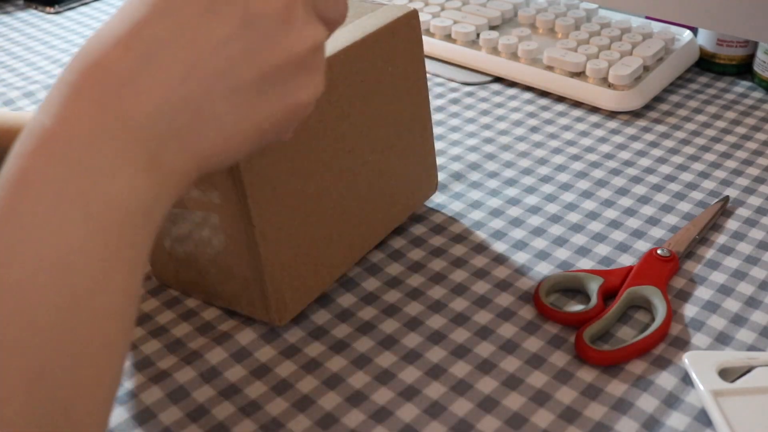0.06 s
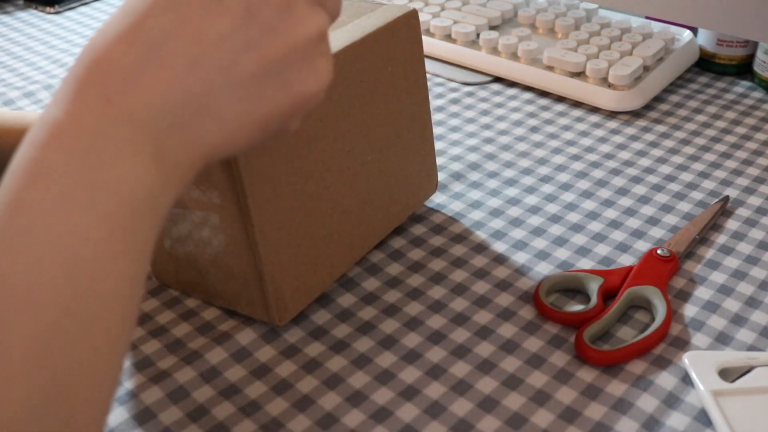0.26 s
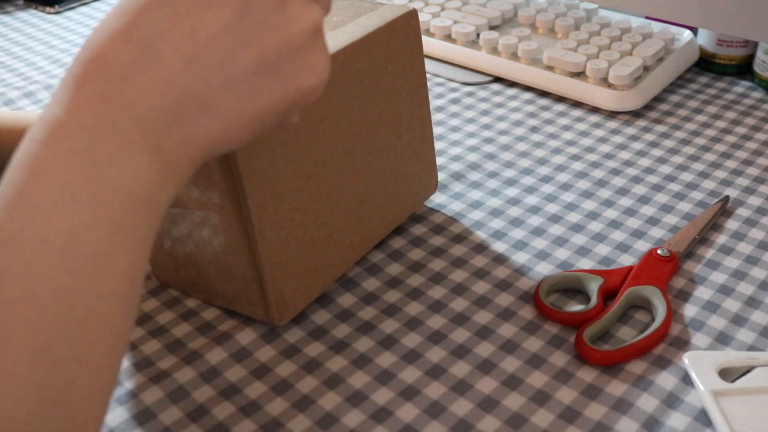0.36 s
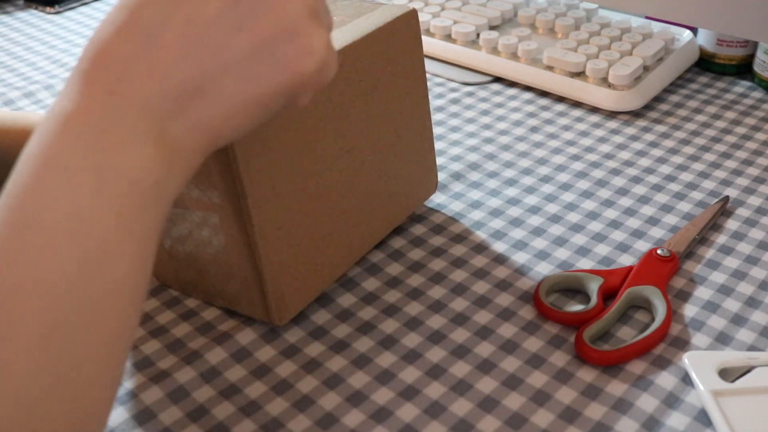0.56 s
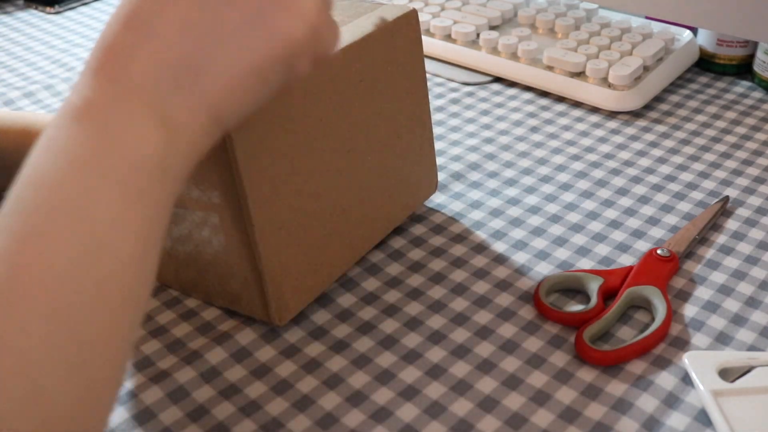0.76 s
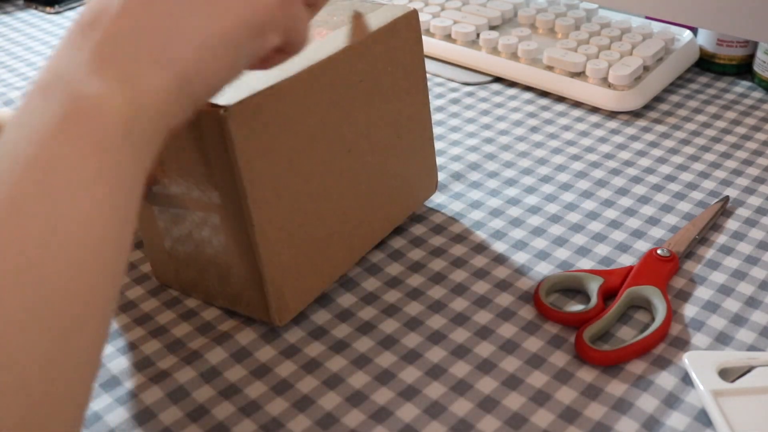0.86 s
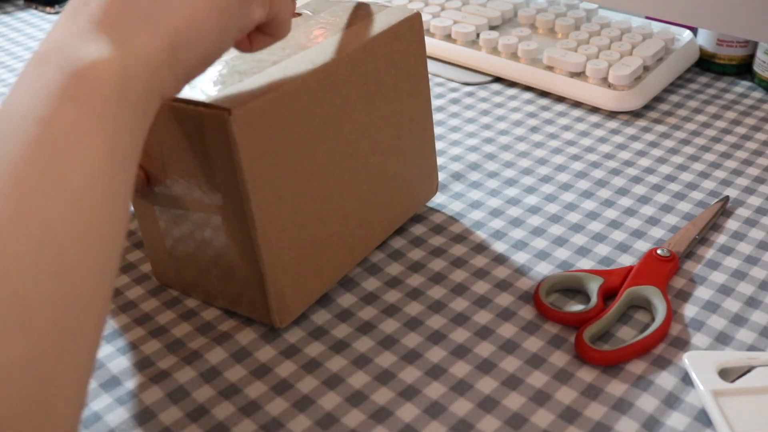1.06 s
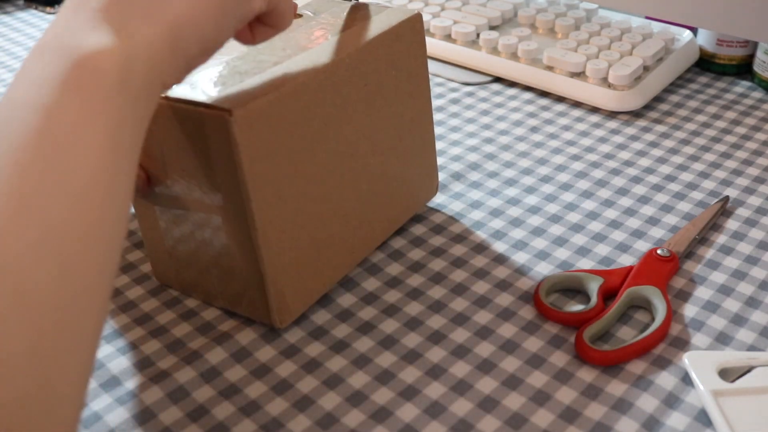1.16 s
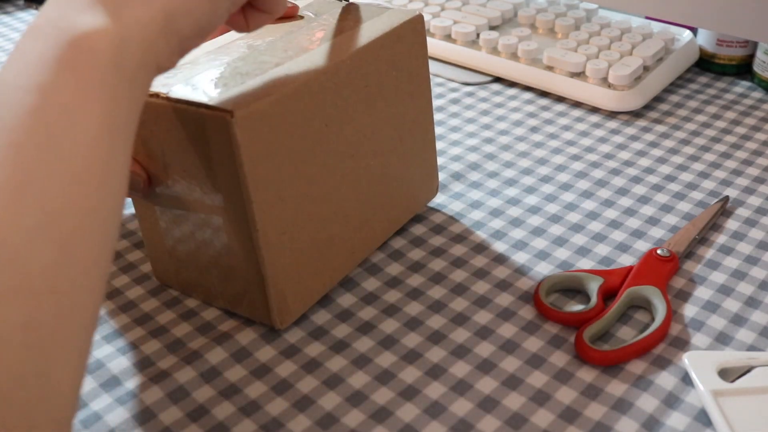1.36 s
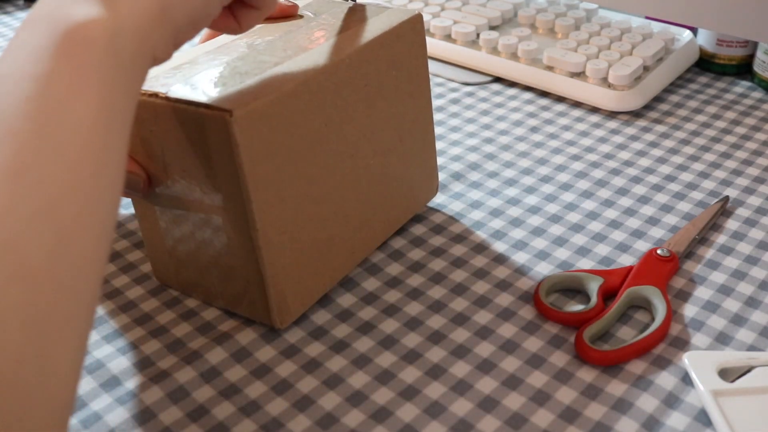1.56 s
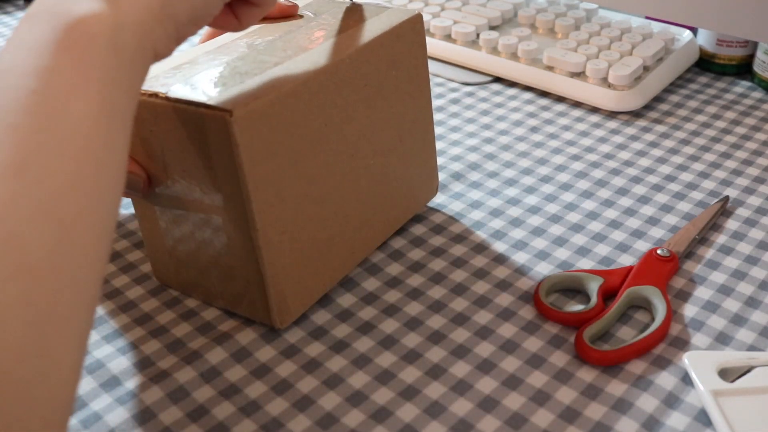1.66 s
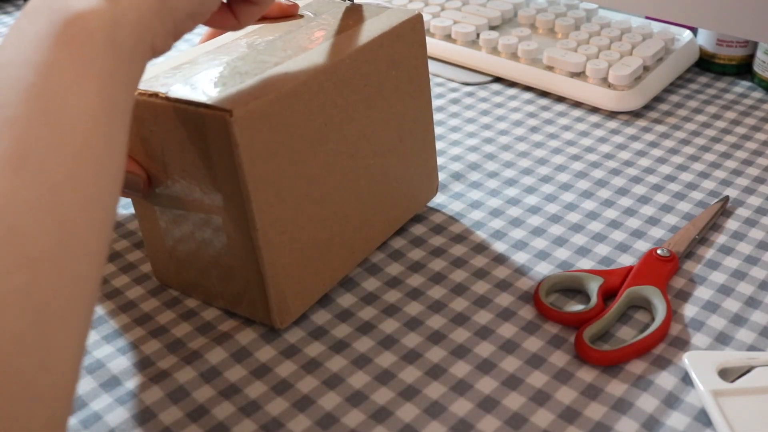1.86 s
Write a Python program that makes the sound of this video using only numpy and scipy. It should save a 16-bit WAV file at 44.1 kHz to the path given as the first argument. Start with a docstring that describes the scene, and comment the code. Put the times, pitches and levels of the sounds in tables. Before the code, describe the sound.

Seven sharp clicks of a craft knife extending, followed by light ticks on taped cardboard.

```python
"""In a small room with a low hum, fingers rub on a craft knife close by and its slider rattles lightly.
The blade is pushed out in seven sharp ratchet snaps that slow down, its ring falling as it lengthens,
and the slider settles with a thin ping. A hand takes hold of a cardboard box, which drones faintly,
then bumps and slides on it. Last, the tip picks at the tape: small ticks, soft thuds and two pops."""
import sys
import numpy as np
from scipy import signal
from scipy.fft import rfft, irfft
from scipy.io import wavfile
from scipy.ndimage import uniform_filter1d

SR = 44100
rng = np.random.default_rng(int(sys.argv[2]) if len(sys.argv) > 2 else 0)


def transcribe(u):
    """Save the signal u as a 16-bit wav file named by the first command-line argument.

    u: samples, shape (n,) or (channels, n), limited to [-1, 1]; the rate is SR.
    q: integer samples, one column per channel.
    """
    v = np.clip(np.atleast_2d(u).T, -1, 1)
    q = np.round(v * 32767).astype(np.int16)
    wavfile.write(sys.argv[1], SR, q)


N = 83790
TIME = np.arange(N) / SR
BRIEF = TIME[:2048]   # time axis of one impact
CLICK_COHERENCE = 0.35   # left-right correlation of close clicks


def from_db(db):
    """Amplitude grows tenfold every 20 dB."""
    return 10 ** (np.asarray(db) / 20)


def rms_one(x):
    """Normalisation: each channel is scaled to rms 1."""
    return x / np.sqrt(np.mean(x ** 2, axis=-1, keepdims=True) + 1e-20)


def at_hz(points, hz):
    """Interpolation on a log-frequency axis."""
    freqs, values = np.transpose(points)
    return np.interp(np.log(hz), np.log(freqs), values)


def pan(db):
    """Interaural level difference: positive is to the left."""
    return from_db([[db / 2], [-db / 2]])


def delayed(x, delay_s):
    """A linear phase shift delays by any fraction of a sample."""
    size = 2 * N
    shift = np.exp(-2j * np.pi * np.fft.rfftfreq(size, 1 / SR) * delay_s)
    return irfft(rfft(x, size) * shift, size)[..., :N]


def stereo_noise(size, coherence):
    """Partial coherence: two channels share part of their white noise."""
    mid, side = rng.standard_normal((2, size))
    return np.sqrt(1 + coherence) * mid + np.sqrt(1 - coherence) * side * [[1], [-1]]


def resonate(x, hz, width_hz):
    """A damped resonator: the wider its band, the faster it decays."""
    r = np.exp(-np.pi * width_hz / SR)
    return signal.lfilter([1, 0, -1], [1, -2 * r * np.cos(2 * np.pi * hz / SR), r * r], x + 1e-18)


def contact(rise_s, delay_s=0):
    """An impact's force swells, then decays exponentially."""
    age = np.maximum(BRIEF - delay_s, 0) / rise_s
    return age * np.exp(-age) + 1e-12


def ring(force, hz, width_hz):
    """Forced vibration of one mode, broadened by a random walk of phase; rms 1."""
    drift = np.cumsum(rng.standard_normal(len(BRIEF))) * np.sqrt(2 * np.pi * width_hz / SR)
    tone = np.sin(2 * np.pi * (hz * BRIEF + rng.random()) + drift)
    return rms_one(resonate(force * tone, hz, 3 * width_hz))


def clack(hz, width_hz):
    """Impulse response of a heavily damped mode; rms 1."""
    impulse = 1.0 * (BRIEF == 0)
    return rms_one(resonate(resonate(impulse, hz, width_hz), hz, width_hz))


def drone(modes):
    """Narrow resonances driven by noise give wavering tones."""
    out = 0
    for hz, db, width in modes:
        narrow = resonate(rng.standard_normal(N + SR), hz, width)
        out = out + from_db(db) * rms_one(resonate(narrow, hz, 2 * width)[SR:])
    return out


def add(track, start_s, db, sound):
    """Superposition of a brief sound; its level is its energy spread over 3 ms."""
    start = int(start_s * SR)
    scale = np.sqrt(.003 / BRIEF[-1])
    track[:, start:start + len(BRIEF)] += scale * from_db(db) * sound[:, :N - start]


EDGES_HZ = np.r_[np.geomspace(22, 2000, 15)[:-1], np.geomspace(2000, 17000, 15)]
# filter bank: centre_hz, width_hz, filter
BANDS = [(np.sqrt(lo * hi), hi - lo, signal.butter(2, [lo, hi], "band", fs=SR, output="sos"))
         for lo, hi in zip(EDGES_HZ, EDGES_HZ[1:])]
# left-right correlation in the room: frequency_hz, coherence
COHERENCE = [(50, 0.9), (250, 0.91), (600, 0.54), (1500, 0.14), (5000, 0.069), (14000, 0.086)]

def coloured(force, spectrum, tilt_db=0, coherence=None):
    """Source and filter: roughness under a force curve excites a bank of bands; rms 1."""
    out = 0
    for hz, width, sos in BANDS:
        noise = stereo_noise(len(force), at_hz(COHERENCE, hz) if coherence is None else coherence)
        if hz > spectrum[0][0] / 2:
            gain = from_db(at_hz(spectrum, hz) + tilt_db * np.log2(hz)) * np.sqrt(width)
            out = out + gain * rms_one(signal.sosfilt(sos, noise * force))
    return rms_one(out)


# the room's hum: pitch_hz, level_db, width_hz
HUM_MODES = [(71.75, -66.5, 6.3), (133.7, -64.5, 7.2), (220, -62.5, 14.6), (264.45, -59, 8.2),
             (334.7, -65.5, 4.6), (415, -71, 19)]
# the room's noise: frequency_hz, density_db
AIR_SPECTRUM = [(15, -44), (25, -2), (70, -5), (175, -3), (256, 0.5), (384, -24), (439, -6), (840, -15.5),
                (1160, -13), (1330, -17), (4370, -27), (6380, -25.5), (7310, -30), (7920, -27.5),
                (16000, -38)]

def background():
    """Stationary noise: a narrowband hum over a broadband floor."""
    return drone(HUM_MODES) + from_db(-54.5) * coloured(np.ones(N), AIR_SPECTRUM)


# fingers on the knife, hand on the box: time_s, level_db
GRIP_LEVELS = [(0, -53), (.03, -64), (.05, -48.5), (.12, -63), (.17, -65), (.23, -67), (1.9, -74.5)]
SLIDE_LEVELS = [(0, -58), (.88, -65), (.925, -73), (.937, -60.5), (.972, -49.5), (1.0, -53.5),
                (1.04, -56.5), (1.09, -64), (1.15, -51.5), (1.24, -77), (1.29, -59), (1.4, -73),
                (1.5, -58.5), (1.6, -77), (1.68, -64), (1.8, -72), (1.9, -82.5)]
# their friction noise: frequency_hz, density_db
GRIP_SPECTRUM = [(400, 5.5), (1500, -18.5), (3500, -24), (6000, -2.5), (10000, -3), (13000, -11.5),
                 (16000, -13)]
SLIDE_SPECTRUM = [(100, -12.5), (250, 1), (400, -8.5), (520, -4), (800, -13), (1300, -6), (2000, -9),
                  (3100, -4.5), (4500, -12.5), (6000, -12), (10000, -14), (16000, -25)]

def rub(levels, spectrum, grain_db):
    """Stick-slip friction: skin catches and slips in grains of a few milliseconds."""
    roughness = rms_one(uniform_filter1d(rng.standard_normal(N), size=130))
    envelope = from_db(np.interp(TIME, *np.transpose(levels)))
    return envelope * coloured(from_db(grain_db * roughness), spectrum)


# light rattles: start_s, level_db, rise_s
RATTLE_HITS = [(0.043, -57, 0.0014), (0.0604, -37, 0.00084), (0.096, -54, 0.00079), (0.111, -40, 0.00032),
               (0.157, -50, 0.00066), (0.174, -43, 0.0014), (0.8860, -46, 0.0016), (0.892, -29, 0.00042),
               (0.8933, -33, 0.0047), (1.3586, -34.5, 0.00056)]
# their colour: frequency_hz, density_db
RATTLE_SPECTRUM = [(500, -17.5), (1700, -19.5), (2600, -10), (3100, -11), (3750, -6), (4500, -7), (5800, 4),
                   (7500, -2), (10000, 4), (13500, -7.5), (16500, -15.5)]

def rattles():
    """Light impacts of slider and blade radiate broadband clicks."""
    out = np.zeros((2, N))
    for start_s, db, rise_s in RATTLE_HITS:
        add(out, start_s, db, coloured(contact(rise_s), RATTLE_SPECTRUM, coherence=CLICK_COHERENCE))
    return out


def snap_force(rebound_db, rise_s=0.0004):
    """Elastic impact: the spring drops into a notch and rebounds once."""
    return contact(rise_s) + from_db(rebound_db) * contact(rise_s, delay_s=0.0012)


# the slider jumps a notch: start_s, case_db, blade_db, blade_pitch_hz, rebound_db,
# tilt_db_per_octave, handle_db, knock_db, wash_db
NOTCHES = [(0.2312, -23.5, -19, 10010, -4.5, -1.5, -32, -61, -35),
           (0.29, -23, -17.5, 10110, -4.5, -1.5, -33, -63, -38),
           (0.3604, -24.5, -17, 9960, -5, 0, -32, -55, -38.5),
           (0.4290, -25, -18.5, 9300, -10, 1, -37, -57, -37.5),
           (0.5092, -21, -19, 9170, -6, 0.5, -46, -53.5, -37.5),
           (0.6042, -18.5, -20, 9050, -4, 1, -39, -49, -37),
           (0.7176, -16.5, -19, 8610, 2, 1, -43.5, -39.5, -34)]
# the case's crack: frequency_hz, density_db
CASE_SPECTRUM = [(400, -50), (1500, -21), (2700, -10.5), (3700, -20.5), (5200, -6.5), (6800, -1.5),
                 (8500, -4), (10600, 8), (12800, 2), (15300, -3), (16500, -4)]

def case_cracks():
    """Impact excitation: each snap cracks through the knife's case."""
    out = np.zeros((2, N))
    for start_s, db, _, _, rebound_db, tilt_db, *_ in NOTCHES:
        crack = coloured(snap_force(rebound_db), CASE_SPECTRUM, tilt_db, CLICK_COHERENCE)
        add(out, start_s, db, pan(-1.5) * crack)
    return out


def blade_rings():
    """A longer bar has a lower natural frequency: the blade's ring falls as it slides out."""
    out = np.zeros((2, N))
    for start_s, _, db, hz, rebound_db, *_ in NOTCHES:
        add(out, start_s, db, pan(2.5) * ring(snap_force(rebound_db), hz, width_hz=740))
    return out


# dull knock in the hand: frequency_hz, density_db
KNOCK_SPECTRUM = [(200, 6), (500, -5), (1200, 9), (2500, -25), (4000, 4.5)]

def handle_knocks():
    """Structure-borne sound: each snap rings the handle and knocks in the hand."""
    out = np.zeros((2, N))
    for start_s, *_, rebound_db, _, handle_db, knock_db, _ in NOTCHES:
        add(out, start_s, handle_db, pan(-7) * ring(snap_force(rebound_db), hz=5395, width_hz=710))
        add(out, start_s, knock_db, coloured(contact(rise_s=0.00038), KNOCK_SPECTRUM))
    return out


# the snaps' wash in the room: frequency_hz, density_db
WASH_SPECTRUM = [(1500, -35), (2700, -13), (3800, -19), (4800, -4), (6000, 3.5), (7500, -0.5), (9000, 7),
                 (10500, 6.5), (12500, 1), (15300, -2), (16500, -23)]

def wash(t60_s=0.32, rise_s=0.00077):
    """Diffuse reflections add in power: the cracks return as a broad, dying hiss."""
    power = 0
    for start_s, *_, db in NOTCHES:
        age = np.maximum(TIME - start_s, 0)
        envelope = from_db(db - 60 * age / t60_s) * (1 - np.exp(-age / rise_s))
        power = power + envelope ** 2
    return np.sqrt(power.mean()) * coloured(np.sqrt(power) + 1e-12, WASH_SPECTRUM)


# the box's resonances: pitch_hz, level_db, width_hz
HELD_BOX_MODES = [(74.6, -61.5, 6.6), (140, -64, 29), (217.4, -62, 19.4), (400, -64, 75)]

def box_drone(midpoint_s=0.84, rise_s=0.13):
    """Resonance: the hollow box begins to drone as the hand takes hold."""
    hold = np.clip((TIME - midpoint_s) / rise_s + .5, 0, 1)
    return hold * drone(HELD_BOX_MODES)


def slider_ping():
    """Free vibration: one high mode rings as the slider settles."""
    out = np.zeros((2, N))
    add(out, start_s=0.8922, db=-34, sound=pan(2.5) * clack(hz=13800, width_hz=510))
    return out


# the hand lands on the box: start_s, level_db, rise_s
HAND_BUMPS = [(0.9312, -41, 0.0023), (.9500, -44, 0.0032), (.9690, -50.5, 0.002)]
# their colour: frequency_hz, density_db
BUMP_SPECTRUM = [(200, -16), (340, 9.5), (560, 5.5), (800, -7), (1400, -7), (2200, -23), (4000, -25)]

def bumps():
    """Soft impacts of the hand put their energy into low frequencies."""
    out = np.zeros((2, N))
    for start_s, db, rise_s in HAND_BUMPS:
        add(out, start_s, db, coloured(contact(rise_s), BUMP_SPECTRUM))
    return out


# the tip picks at the tape: start_s, level_db, rise_s, tilt_db_per_octave, thud_db
TAPE_PICKS = [(1.0456, -41.5, 0.0021, 5, -53), (1.1018, -40, 0.0039, 4, -67),
              (1.1085, -38.5, 0.0036, 8, -70), (1.1251, -40, 0.00038, 20, -68),
              (1.2050, -44, 0.00018, 7.5, -45), (1.266, -42.5, 0.00012, 9, -44),
              (1.325, -43, 0.0024, 1, -69), (1.3515, -46.5, 0.00035, 2, -48.5),
              (1.3585, -43.5, 0.00025, 3, -43), (1.4281, -48, 0.0014, 1.5, -55),
              (1.4768, -51.5, 0.00056, -2.5, -44.5), (1.5514, -46, 0.0012, 0.5, -47),
              (1.6700, -48, 0.0031, -1, -77), (1.6997, -45, 0.0012, 3, -50),
              (1.7555, -56, 0.00079, 2.5, -76), (1.8735, -40, 0.00048, 6.5, -42.5)]
# the tape's tick, the box's thud: frequency_hz, density_db
TAPE_SPECTRUM = [(900, -7), (2200, -19), (3600, -5.5), (4600, -15.5), (6000, -1), (7500, -16), (9500, -20),
                 (13000, -31.5), (16500, -52)]
THUD_SPECTRUM = [(120, -14), (260, 4), (400, 5), (560, -6), (700, -18), (1400, -10.5), (2500, -25)]

def picks():
    """Mechanical coupling: each pick ticks the tape, pings the tip and nudges the hollow box."""
    out = np.zeros((2, N))
    for start_s, db, rise_s, tilt_db, thud_db in TAPE_PICKS:
        add(out, start_s, db, coloured(contact(rise_s), TAPE_SPECTRUM, tilt_db, CLICK_COHERENCE))
        sharpness = 1 / (1 + rise_s / 0.00051)   # slower contacts ping less
        add(out, start_s, db - 1.5, sharpness * pan(0) * clack(hz=6100, width_hz=1200))
        add(out, start_s, thud_db, coloured(contact(rise_s=0.0036), THUD_SPECTRUM))
    return out


# the cardboard gives way: start_s, level_db, tilt_db_per_octave
CARDBOARD_POPS = [(1.1261, -31, 0), (1.4779, -43.5, -12.5)]
# its resonances: pitch_hz, level_db, width_hz
CARDBOARD_MODES = [(1890, -15.5, 470), (2440, -3.5, 620), (2740, -5, 580), (4040, -7.5, 460),
                   (6860, -18, 1300), (9600, -12, 1700)]

def pops(pivot_hz=2440):
    """Modal superposition: cardboard giving way strikes its damped modes all at once."""
    out = np.zeros((2, N))
    for start_s, db, tilt_db in CARDBOARD_POPS:
        for hz, mode_db, width in CARDBOARD_MODES:
            level_db = db + mode_db + tilt_db * np.log2(hz / pivot_hz)
            add(out, start_s, level_db, pan(-6.5) * clack(hz, width))
    return out


# the room's reverberant share: frequency_hz, gain_db
ROOM_GAINS = [(300, 5.5), (1500, -14), (3200, -11), (5300, -4.5), (7500, -8.5), (10000, -9.5),
              (14500, -16.5)]

def room(x, onset_s=0.00096):
    """Reverberation: convolution with a diffuse tail that lasts slightly longer in the treble."""
    t, response = TIME[:SR // 2], 0
    for hz, width, sos in BANDS:
        t60_s = np.interp(hz, [4000, 12000], [0.3, 0.33])
        decay = from_db(-60 * t / t60_s) * (t > onset_s)
        tail = signal.sosfilt(sos, stereo_noise(len(t), at_hz(COHERENCE, hz)) * decay)
        gain = from_db(at_hz(ROOM_GAINS, hz)) * np.sqrt(2 * width / SR / len(t))
        response = response + gain * rms_one(tail)
    return signal.fftconvolve(x, response, axes=1)[:, :N]


def scene():
    """Direct sound, one near wall's reflection and reverberation add to the rubbing and the drones."""
    cracks = case_cracks()
    body = handle_knocks() + rattles() + slider_ping()
    rings = blade_rings()
    box = picks() + bumps() + pops()
    left, right = cracks + body + rings
    direct = np.array([left, delayed(right, delay_s=0.0000205)]) + box   # the knife is a little left
    wall = from_db(-14.5) * delayed(direct, delay_s=0.011)
    reverb = wash() + room(from_db(-0.5) * body + from_db(-5.5) * rings + from_db(-2.5) * box)
    grip = rub(GRIP_LEVELS, GRIP_SPECTRUM, grain_db=4.5)
    slide = rub(SLIDE_LEVELS, SLIDE_SPECTRUM, grain_db=3.0)
    return direct + wall + reverb + grip + slide + box_drone() + background()


def record(dry):
    """Band limiting removes rumble below 40 Hz and treble above 16.3 kHz."""
    dry = signal.sosfilt(signal.butter(2, 40, "high", fs=SR, output="sos"), dry)
    return signal.sosfilt(signal.ellip(10, .2, 70, 16300, fs=SR, output="sos"), dry)


dry = scene()
out = record(dry)
transcribe(out)
```